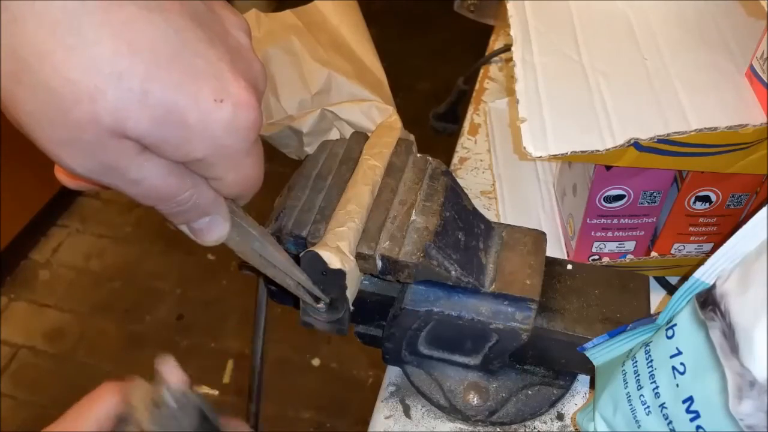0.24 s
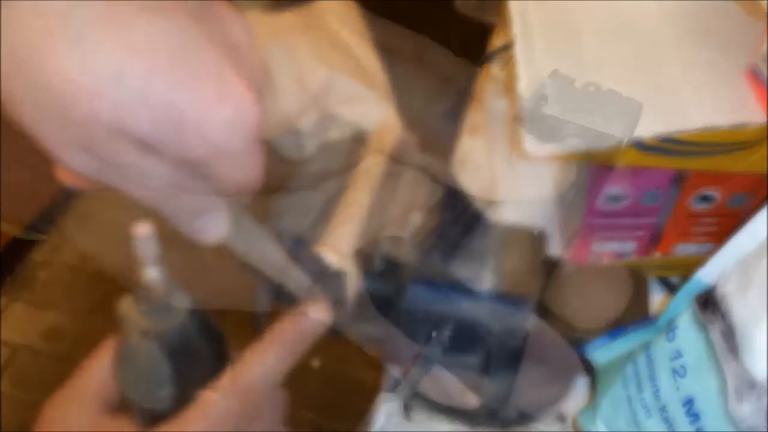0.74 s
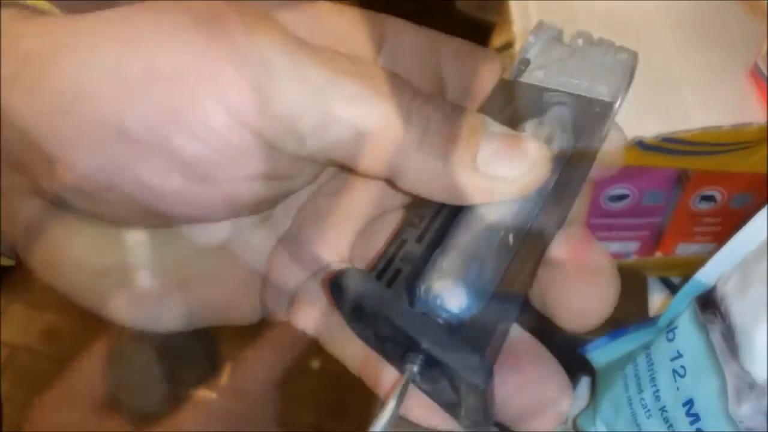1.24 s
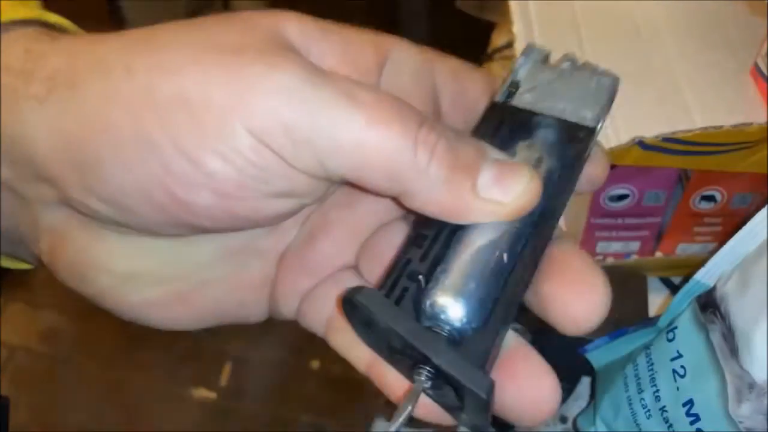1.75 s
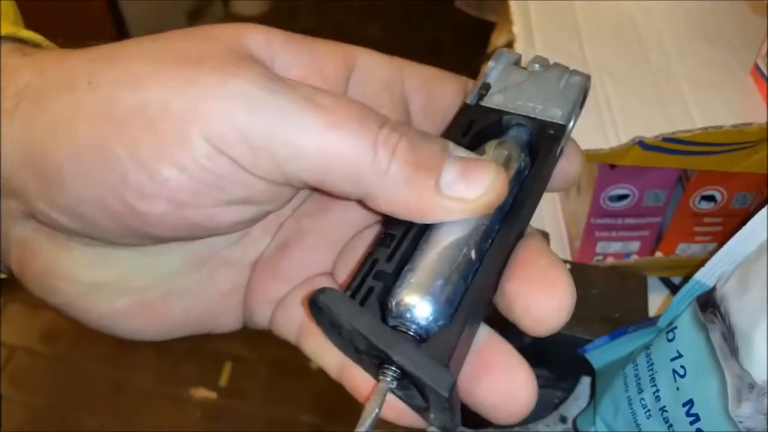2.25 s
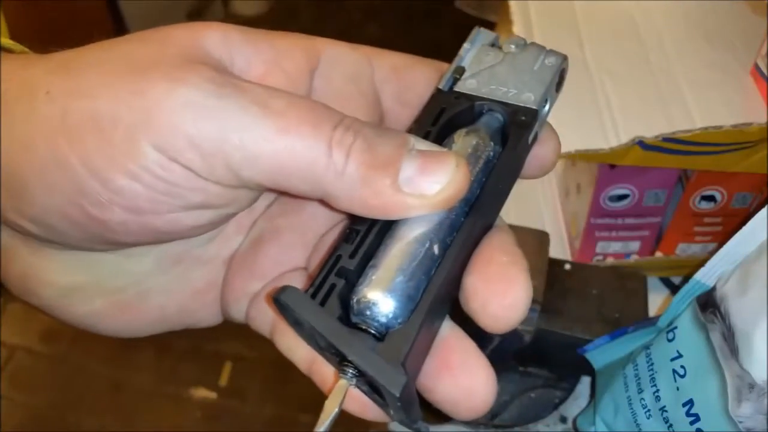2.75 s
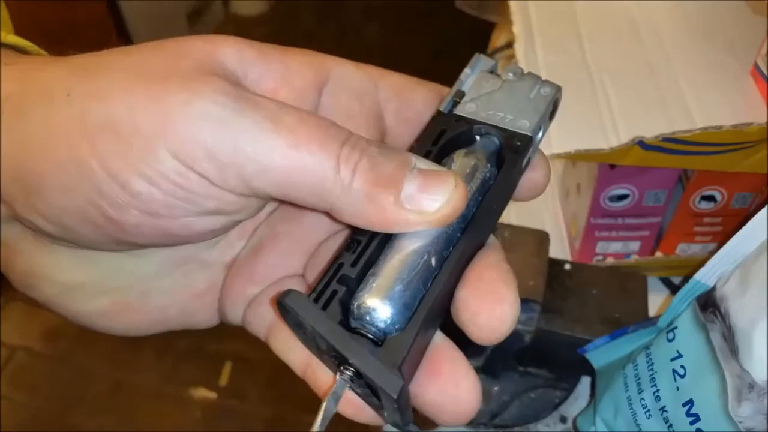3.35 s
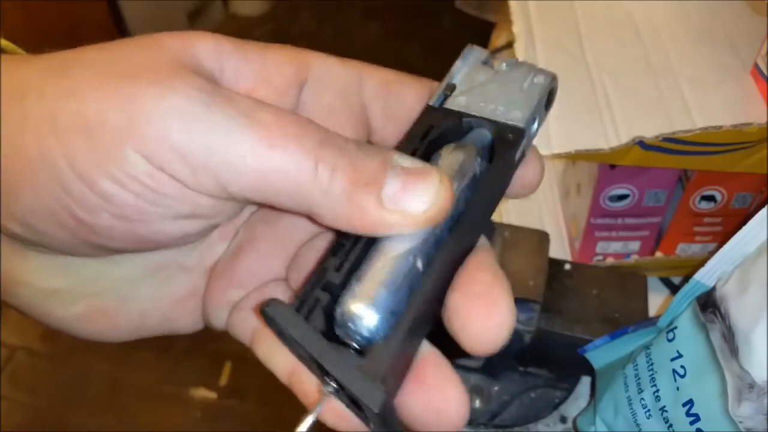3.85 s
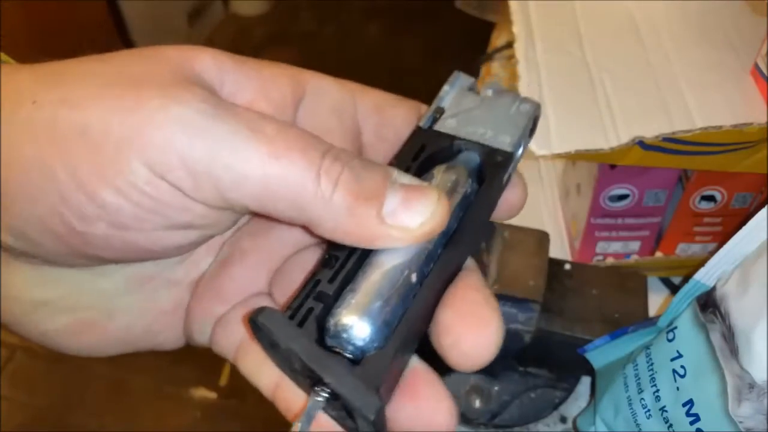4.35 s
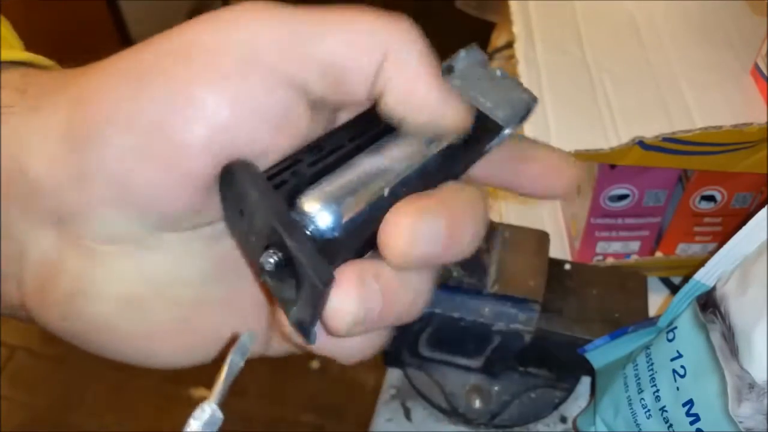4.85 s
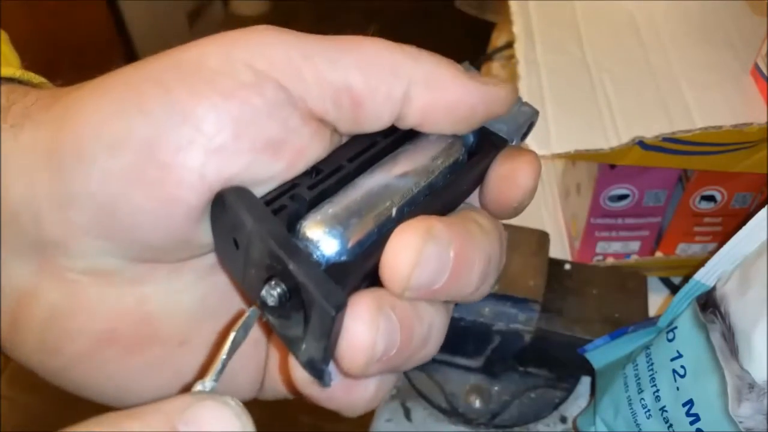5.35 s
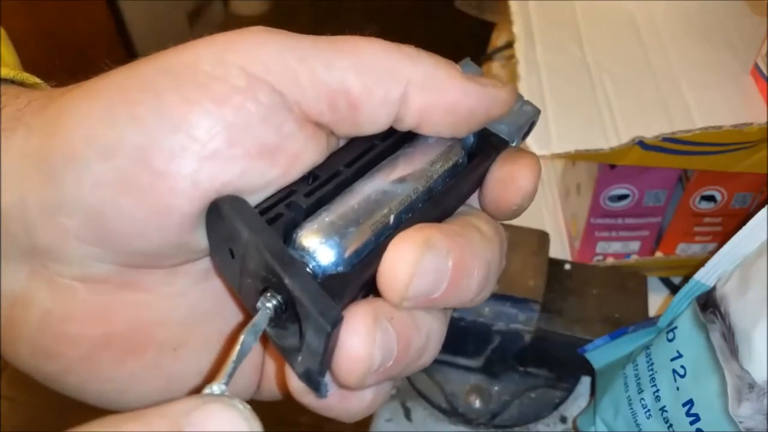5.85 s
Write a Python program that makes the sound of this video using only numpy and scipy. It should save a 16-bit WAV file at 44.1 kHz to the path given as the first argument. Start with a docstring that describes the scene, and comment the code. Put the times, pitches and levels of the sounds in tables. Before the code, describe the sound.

A handheld rotary tool skips and grinds on a metal screw for the first 0.2 seconds, then runs free with a high whine and rattling bearing, fading out by 1.6 seconds. Right then, gas bursts from a small cartridge in a loud, bright, crackling hiss with sharp spits and little pops. From about 1.9 seconds the hiss weakens and sputters, swells slightly around 3.1, and drops at 3.3 to a faint seep that is gone by 4 seconds. At 4.1 a screwdriver blade clacks sharply against the screw. Lighter ticks and short gritty scrapes follow around 4.6 to 4.8 and again from 5.5 to 6.1, while fingers rub very faintly on the plastic holder. Everything is close to the microphone and slightly to the left, in a small workshop with a barely audible appliance hum.

```python
"""A small, faintly humming workshop, with the work close to a stereo microphone and slightly to its left.
A handheld rotary tool grinds a screw, lifts off and whines freely while its sound fades away.
A screwdriver loosens the screw under a gas cartridge: gas bursts through the seal, sputters and hisses
until it is spent. Then the blade knocks and ticks on the screw as fingers shift on the plastic holder."""
import sys
import numpy as np
from scipy import signal
from scipy.fft import rfft, irfft, next_fast_len
from scipy.io import wavfile
from scipy.ndimage import uniform_filter1d, map_coordinates

SR = 44100
rng = np.random.default_rng(int(sys.argv[2]) if len(sys.argv) > 2 else 0)


def log_audio(samples):
    """Write samples as a 16-bit WAV file to the path given in sys.argv[1]."""
    # one column per channel
    frames = np.atleast_2d(samples).T
    # limit to full scale, then quantise
    limited = np.clip(frames, -1, 1)
    pcm = np.round(limited * 32767).astype(np.int16)
    wavfile.write(sys.argv[1], SR, pcm)


N = 268569
T = np.arange(N) / SR


def amp(db):
    """Decibels to gain."""
    return 10 ** (np.asarray(db) / 20)


def unit(x):
    """Scale to rms 1."""
    return x / np.sqrt(np.mean(x ** 2) + 1e-20)


def along(points, hz):
    """Read (frequency, value) points on a log frequency axis."""
    freqs, values = np.transpose(points)
    return np.interp(np.log(hz + 1), np.log(freqs + 1), values)


def ramp(start_s, length_s):
    """A straight rise from 0 to 1."""
    return np.clip((T - start_s) / length_s, 0, 1)


def swell(middle_s, half_width_s):
    """A smooth rise and fall around a moment."""
    return np.exp(-((T - middle_s) / half_width_s) ** 2)


def wobble(per_s):
    """A smooth random curve through per_s knots a second."""
    return map_coordinates(rng.standard_normal(int(N * per_s / SR) + 4), [T * per_s])


def bursts(times, gains, t60_s):
    """Envelope of sudden bursts that die away, adding in power."""
    hits = np.bincount(np.clip(np.asarray(times) * SR, 0, N - 1).astype(int), np.asarray(gains) ** 2, N)
    power = signal.lfilter([1], [1, -amp(-120 / (t60_s * SR))], hits)
    return np.sqrt(np.abs(power))


def grains(per_s, spread_db, t60_s, count=20000):
    """Envelope (rms 1) of random bursts of uneven size."""
    times = np.cumsum(rng.exponential(1 / per_s, count))
    sizes = amp(spread_db * np.clip(rng.standard_normal(count), -2, 2))
    return unit(bursts(times[times < N / SR], sizes[times < N / SR], t60_s))


def stray(per_s, spread_db, t60_s, count=400):
    """Envelope of loosely spaced bursts with peaks around 1."""
    times = np.cumsum(rng.uniform(.3, 1.7, count)) / per_s
    sizes = amp(spread_db * rng.uniform(-1, 1, count))
    return bursts(times[times < N / SR], sizes[times < N / SR], t60_s)


def filtered(x, response):
    """Multiply the spectrum of x by a function of frequency."""
    length = x.shape[-1]
    padded = next_fast_len(length + 8192)
    return irfft(rfft(x, padded) * response(np.fft.rfftfreq(padded, 1 / SR)), padded)[..., :length]


def coloured(x, spectrum, size=2048):
    """Shape x with a minimum-phase filter of unit energy: only the spectrum's shape counts."""
    gain_db = np.maximum(along(spectrum, np.fft.rfftfreq(size, 1 / SR)), -100)
    cepstrum = irfft(np.log(amp(gain_db)))
    cepstrum[1:size // 2] *= 2
    cepstrum[size // 2 + 1:] = 0
    kernel = irfft(np.exp(rfft(cepstrum)))
    return signal.fftconvolve(x, kernel[None] / np.linalg.norm(kernel), axes=1)[:, :x.shape[1]]


def ringing(x, modes):
    """Add band-pass resonances to x."""
    def response(hz):
        return 1 + sum(amp(db) * 1j * hz * width / (pitch ** 2 - hz ** 2 + 1j * hz * width)
                       for pitch, width, db in modes)
    return filtered(x, response)


def pan(left_db):
    """Channel gains that put the left left_db above the right."""
    return amp([[left_db / 2], [-left_db / 2]])


def left_first(x, lead_ms):
    """A source off to the left reaches that side of the microphone sooner."""
    return filtered(x, lambda hz: np.exp(1j * np.pi * hz * lead_ms / 1000 * np.array([[1], [-1]])))


# Likeness of the microphone's two sides: frequency_hz, correlation
STEREO_LIKENESS = [(60, 0.22), (300, 0.47), (700, 0.28), (1500, 0.21), (4000, 0.078)]
def noise():
    """White stereo noise, partly alike in the bass and almost unrelated in the treble."""
    def mid_side_gains(hz):
        angle = np.arccos(np.clip(along(STEREO_LIKENESS, hz), -1, 1)) / 2
        return np.array([np.cos(angle), np.sin(angle)])
    mid, side = filtered(rng.standard_normal((2, N)), mid_side_gains)
    return unit(np.array([mid + side, mid - side]))


def nearby(x, echo_db, t60_s, size=4096):
    """Reflections from hand, vice and bench ripple the spectrum."""
    t = np.arange(size) / SR
    tail = rng.standard_normal((2, size)) * amp(-60 * t / t60_s) * (t > .002)
    tail *= amp(echo_db) / np.linalg.norm(tail, axis=1, keepdims=True)
    return (x + signal.fftconvolve(x, tail, axes=1)[:, :N]) / np.hypot(1, amp(echo_db))


# Decay of the small room: frequency_hz, t60_s
ROOM_DECAY = [(200, 0.16), (3000, 0.22), (8000, 0.17), (15000, 0.18)]
def walls(x):
    """The close walls answer after 5 ms with a short tail."""
    hz, t, spectra = signal.stft(rng.standard_normal((2, SR // 2)), SR, nperseg=256)
    tail = signal.istft(spectra * amp(-60 * t / along(ROOM_DECAY, hz)[:, None]), SR, nperseg=256)[1]
    tail = np.pad(tail, ((0, 0), (SR // 200, 0)))
    return signal.fftconvolve(x, tail / np.linalg.norm(tail[0]), axes=1)[:, :N]


# Room tone all around the microphone: frequency_hz, relative_db
ROOM_SPECTRUM = [(12, -40), (20, -5), (27, -17), (104, -11), (228, -15.5), (270, -6.5), (310, -17.5),
                 (357, -7.5), (542, -14), (624, -18), (825, -14.5), (1120, -24.5), (1570, -24),
                 (4060, -34.5), (16000, -30.5)]
# An appliance in the background: pitch_hz, level_db
HUM_TONES = [(71.9, -87), (100, -87), (261.6, -90.5), (362.9, -84), (818.6, -79.5), (1620, -93.5),
             (9250, -95)]
def workshop():
    """Room tone with the faintly wavering hum of an appliance."""
    hum = sum(amp(db) * unit(amp(1.5 * wobble(3)) * np.sin(2 * np.pi * hz * T + .5 * wobble(4)))
              for hz, db in HUM_TONES)
    room_tone = amp(-69.5) * unit(filtered(noise(), lambda hz: amp(along(ROOM_SPECTRUM, hz))))
    return (hum + room_tone) * pan(1.5)


# Fingers shifting on the holder, close up: middle_s, half_width_s, level_db
FINGER_STROKES = [(3.584, 0.056, -70.5), (4.2, 0.39, -79.5), (4.77, 0.123, -73.5), (5.0, 0.15, -74.5),
                  (5.85, 0.35, -78)]
# Skin on plastic: frequency_hz, relative_db
SKIN_SPECTRUM = [(590, -42), (1000, -10), (1810, 2), (2780, -4.5), (3980, -4.5), (4410, -7), (9380, -10.5),
                 (10300, -4), (16000, -28)]
def hand():
    """Fingers rub the plastic; one soft bump goes through the grip."""
    strokes = sum(amp(db) * swell(middle, half) for middle, half, db in FINGER_STROKES)
    friction = noise() * unit(5 + grains(per_s=230, spread_db=4, t60_s=.008))
    rub = strokes * coloured(friction, SKIN_SPECTRUM) * pan(4)
    bump_age_s = np.maximum(T - 5.94, 0)
    bump = amp(-65) * np.sin(2 * np.pi * 68 * bump_age_s) * amp(-60 * bump_age_s / .15)
    return rub + bump


# Blade meeting screw, close up: start_s, strength_db, brightness_db, scrape_db
BLADE_CONTACTS = [(3.8396, -61, -19.5, -65), (4.1068, -21.5, -21.5, -47.5), (4.5825, -51, -28.5, -60.5),
                  (4.5983, -52, -25.5, -54), (4.6206, -37.5, -24, -51), (4.6343, -46.5, -17.5, -68),
                  (4.73, -37, -4.5, -55), (4.7514, -48, -0.5, -64), (4.9836, -60, -7, -77),
                  (5.5304, -49.5, -6, -65), (5.538, -54.5, -16, -60.5), (5.58, -52, -30, -63.5),
                  (5.7324, -47.5, -27, -58.5), (5.7498, -51.5, -23, -59.5), (5.9478, -48, -28, -65.5),
                  (6.0726, -57.5, -25.5, -65)]
# The screw knocking in its plastic holder: frequency_hz, relative_db
CLACK_SPECTRUM = [(88, -72), (150, -26.5), (759, -11), (1020, -10), (1630, -15), (1830, -5.5), (2220, -7.5),
                  (2750, -4), (4080, -5), (5050, -13), (5790, -9), (6640, -19), (8730, -13), (16000, -28.5)]
# The screw's own ring: pitch_hz, width_hz, gain_db
SCREW_MODES = [(1700, 300, -4), (4050, 350, 2), (5850, 300, -2), (9000, 300, -3)]
# The blade sliding: frequency_hz, relative_db
SCRAPE_SPECTRUM = [(530, -21), (900, -4.5), (1100, -6), (1290, -3), (1620, -3), (2040, 1), (3730, -5.5),
                   (4980, 1.5), (5960, -7), (14900, -22), (16000, -31.5)]
def screwdriver():
    """Each contact is a clack of screw and holder, with a bright snap of steel and a gritty scrape."""
    start_s, strength_db, brightness_db, scrape_db = np.transpose(BLADE_CONTACTS)
    blows = bursts(start_s, amp(strength_db - 7), t60_s=.013)
    clack = ringing(coloured(noise() * blows, CLACK_SPECTRUM), SCREW_MODES)
    snaps = bursts(start_s, amp(strength_db + brightness_db - 7), t60_s=.015)
    steel_spectrum = [(3000, -28), (7000, 10.5), (10000, -1), (16000, -10)]
    snap = coloured(noise() * snaps, steel_spectrum)
    # every contact slides on; light ones also slide in, while a hard blow comes out of the air
    is_light = strength_db < -30
    approach = sum(gain * swell(s, .0085) for s, gain in zip(start_s, amp(scrape_db - 6) * is_light))
    slide = np.hypot(bursts(start_s, amp(scrape_db), t60_s=.12), approach)
    grit = unit(.9 + grains(per_s=600, spread_db=2.5, t60_s=.005))
    scrape = nearby(coloured(noise() * slide * grit, SCRAPE_SPECTRUM), echo_db=-6.5, t60_s=.03)
    return (clack + snap + scrape) * pan(3.6)


# Air from the tool's fan: frequency_hz, relative_db
FAN_SPECTRUM = [(1760, -28.5), (3000, -2.5), (3520, -6), (4470, -4.5), (5250, -4), (5710, -3),
                (7150, -10.5), (8050, -6.5), (9200, -11), (11200, -9), (12100, -13.5), (14300, -14),
                (16000, -30.5)]
def cooling_fan(once_a_turn, throb):
    """Fan air pulses with the shaft and the torque, fading 2 dB a second faster than the motor."""
    rush = coloured(noise() * unit(once_a_turn * (1 + .2 * throb)), FAN_SPECTRUM)
    return amp(-.7 - 2 * T) * nearby(rush, echo_db=-5.5, t60_s=.048) * pan(.96)


# The bearing heard through the housing: frequency_hz, relative_db
HOUSING_SPECTRUM = [(88, -52.5), (150, -23), (217, -28.5), (311, -15), (347, -10.5), (524, -8.5), (680, -2),
                    (945, -4.5), (1230, -0.5), (1450, -4), (1600, -11.5), (1850, -5), (2250, -9.5),
                    (2760, -6), (3260, -16), (4000, -15), (5200, -48), (8800, -120)]
def bearing(once_a_turn, throb):
    """The bearing chatters and knocks, harder for a while before it settles."""
    loose_db = 2 * (ramp(.328, .02) - ramp(.695, .018))
    impacts = .7 + grains(per_s=260, spread_db=2.5, t60_s=.01)
    chatter = unit((1 + .35 * throb) * once_a_turn * impacts)
    level = amp(.5 + loose_db + .49 * wobble(12))
    rattle = nearby(coloured(noise() * chatter, HOUSING_SPECTRUM), echo_db=-4.5, t60_s=.044)
    knocks = coloured(noise() * stray(per_s=30, spread_db=3, t60_s=.015), HOUSING_SPECTRUM)
    return level * rattle * pan(2.2) + amp(7.5 + loose_db) * knocks


def rough_tone(turns, roughness, width_hz):
    """A tone that bearing play partly smears into a narrow band, differently in each direction."""
    smear = np.array([wobble(width_hz) + 1j * wobble(width_hz)
                      + wobble(width_hz / 4) + 1j * wobble(width_hz / 4) for _ in range(2)]) / 2
    steady = unit(amp(1.8 * wobble(12))) * np.exp(2j * np.pi * rng.random())
    envelope = np.sqrt(1 - roughness) * steady + np.sqrt(roughness) * smear
    return unit(np.real(envelope * np.exp(2j * np.pi * turns)))


# Motor tones at the microphone: shaft_multiple, relative_db, left_db, roughness_share
SHAFT_ORDERS = [(1.004, -21, -1.5, 0.1), (2, -15, -8.5, .5), (4, -25, -3.5, .75), (8, -15.5, 6.5, 0.6),
                (16.1, -21, 17, .9), (19.1, -30.5, -6, .9), (24.08, -25.5, -2, .95), (31.8, -19, -11.5, 1),
                (40, -33, 1, .95)]
def motor_whine(turns):
    """Tones at the nearest whole multiples of the shaft speed, the higher ones smeared more widely."""
    return sum(amp(db) * pan(left_db) * rough_tone(round(order) * turns, roughness, 50 * np.sqrt(order))
               for order, db, left_db, roughness in SHAFT_ORDERS)


def rotary_tool():
    """The unloaded motor speeds up, throbbing with the mains-fed torque, while its sound fades away."""
    loaded_hz, free_hz, spin_up_s = 343.3, 349.5, .92
    shaft_hz = loaded_hz + (free_hz - loaded_hz) * ramp(0, spin_up_s)
    throb = np.sin(2 * np.pi * 100 * T)
    turns = np.cumsum(shaft_hz * (1 + .0005 * wobble(23) + .0016 * throb)) / SR
    once_a_turn = 1 + .15 * np.sin(2 * np.pi * turns)
    whine = amp(3) * motor_whine(turns)
    # the wheel squeals as it leaves the screw
    squeal = amp(-46) * swell(.21, .089) * rough_tone(16 * turns, roughness=.8, width_hz=300) * pan(8)
    running = whine + bearing(once_a_turn, throb) + cooling_fan(once_a_turn, throb)
    fade = amp(-42.5) * (1 - ramp(0, 1.723)) ** .85
    return (fade * running + squeal) * (1 - ramp(1.6, .03))


# The wheel catching, close up: start_s, strength_db, chips_db
WHEEL_CATCHES = [(0.003, -23, -27.5), (0.036, -22.5, -28.5), (0.0727, -14, -35), (0.105, -29.5, -32.5),
                 (0.138, -26, -32.5)]
# Chips torn from the screw: frequency_hz, relative_db
CHIP_SPECTRUM = [(70, -21), (110, -11.5), (155, -2.5), (220, -5), (400, -5.5), (700, 1.5), (1000, 1.5),
                 (1450, 9.5), (1800, 1), (4000, -1), (6500, 1), (9000, 1), (11000, -3), (16000, -11)]
def grinding():
    """The wheel skips and catches on the screw; a spray of tiny chips swells just after each catch."""
    start_s, strength_db, chips_db = np.transpose(WHEEL_CATCHES)
    bite = sum(amp(db) * swell(s + .0053, .011) for s, db in zip(start_s, chips_db))
    chips = amp(-1) * bite * grains(per_s=1700, spread_db=1, t60_s=.0018)
    catches = bursts(start_s, amp(strength_db - 6.5), t60_s=.017)
    return coloured(noise() * np.hypot(chips, catches), CHIP_SPECTRUM)


# The whisper of the nearly empty cartridge: frequency_hz, relative_db
SEEP_SPECTRUM = [(300, -28), (1200, -5), (2300, -4), (3500, -8.5), (6000, -9), (7200, -2), (9500, 0),
                 (11000, -0.5), (13000, -2), (16000, -6.5)]
def gas_seep():
    """The last gas seeps out, holds briefly and dies away."""
    end_s, release_db_per_s = 3.74, 83
    level = ramp(3.25, .08) * amp(-69 - release_db_per_s * np.maximum(T - end_s, 0))
    return level * coloured(noise(), SEEP_SPECTRUM) * pan(2.8)


# Gas passing the seal: time_s, level_db
SEAL_FLOW = [(1.61, -32.5), (1.65, -24.5), (1.755, -25), (1.815, -36), (1.86, -32), (1.915, -40.5),
             (2.05, -43.5), (2.12, -49), (2.19, -45), (2.22, -52.5), (2.6, -49.5), (2.7, -47.5),
             (2.95, -48.5), (3.1, -40.5), (3.22, -42), (3.29, -50)]
def gas_flow(pressure_lost):
    """Strength of the jet from the opening of the seal until empty; a weak jet clogs for moments."""
    open_s, empty_s, clog_db = 1.599, 3.325, 10
    flow_db = np.interp(T, *np.transpose(SEAL_FLOW))
    clogs = stray(per_s=3.2, spread_db=3, t60_s=.016) > amp(-60)
    clogged = uniform_filter1d(clogs.astype(float), SR // 200)
    level = amp(flow_db - clog_db * pressure_lost * clogged + .99 * wobble(35))
    return level * ramp(open_s, .0066) * (1 - ramp(empty_s, .021))


# The jet close up, at full and at low pressure: frequency_hz, relative_db
STRONG_JET_SPECTRUM = [(2650, -38.5), (4500, -24), (5000, -18), (5680, -6), (6150, -11.5), (6590, -9),
                       (7030, -2), (7370, -3), (7820, -1.5), (8240, 0.5), (9360, -5.5), (10200, 0.5),
                       (13300, -10.5), (15200, -12.5), (16000, -15.5)]
WEAK_JET_SPECTRUM = [(2350, -45.5), (4000, -14.5), (4360, -10), (5220, -12), (7140, 0), (7620, -3.5),
                     (8600, -1), (9220, -1), (10000, -3.5), (12000, -6.5), (12800, -6), (15100, -7.5),
                     (16000, -19)]
# Low sputter under the hiss: frequency_hz, relative_db
SPUTTER_SPECTRUM = [(88, -40.5), (150, -12), (326, -1), (378, -17), (632, 1.5), (5000, 2.5), (6500, -29),
                    (11000, -120)]
# The jet striking the palm: frequency_hz, relative_db
PALM_SPECTRUM = [(20, -13.5), (45, -10), (120, -0.5), (200, -7.5), (300, 0.5), (450, 0), (600, -3),
                 (1000, -30.5), (3000, -52)]
def gas_jet(pressure_lost):
    """Mist and drops chop the hiss into crackle, and its colour shifts as the pressure falls."""
    mist = grains(per_s=900, spread_db=2, t60_s=.003)
    drops = grains(per_s=70, spread_db=3, t60_s=.0026)
    crackle = unit(1.2 + mist + .4 * drops)
    strong = nearby(coloured(noise() * crackle, STRONG_JET_SPECTRUM), echo_db=-2.5, t60_s=.025)
    weak = nearby(coloured(noise() * crackle, WEAK_JET_SPECTRUM), echo_db=-5, t60_s=.025)
    hiss = amp(-.5) * (np.sqrt(1 - pressure_lost) * strong + np.sqrt(pressure_lost) * weak)
    sputter = amp(-10.5 - 4 * pressure_lost) * coloured(noise() * crackle, SPUTTER_SPECTRUM)
    # only the strong jet buffets the palm
    buffet = amp(-22.5) * (1 - pressure_lost) * coloured(noise(), PALM_SPECTRUM)
    return hiss + sputter + buffet


# Large spits at the seal: start_s, spit_db, pop_db
LIQUID_SPITS = [(1.6013, -18.5, -47), (1.742, -19, -21.5), (1.8042, -14, -45), (1.8413, -17.5, -48),
                (1.8809, -18, -28), (1.9611, -27.5, -49), (2.075, -25.5, -46), (2.581, -31, -58),
                (2.6358, -22.5, -43), (2.6957, -29.5, -48), (2.716, -28, -48), (3.0022, -23, -52),
                (3.08, -24.5, -55), (3.1686, -21, -46.5), (3.2302, -22.5, -61)]
def gas_spits(weak_flow):
    """Liquid gas spits, each time with a low pop; small droplets join in as the jet weakens."""
    start_s, spit_db, pop_db = np.transpose(LIQUID_SPITS)
    droplets = amp(7.5) * weak_flow * stray(per_s=24, spread_db=4, t60_s=.008)
    spits = bursts(start_s, amp(spit_db - 7), t60_s=.0088) + droplets
    pops = bursts(start_s, amp(pop_db + 3.5), t60_s=.0088) + amp(-14) * droplets
    return coloured(noise() * spits, WEAK_JET_SPECTRUM) + coloured(noise() * pops, SPUTTER_SPECTRUM)


# Air pockets around the cartridge: pitch_hz, width_hz, gain_db
POCKET_MODES = [(5704, 620, -8), (7215, 400, -5), (7960, 290, -8.5), (9160, 370, -5.5), (15600, 500, -2.5)]
def gas_cartridge():
    """The cartridge empties through its seal; jet and spits ring the air pockets around it."""
    pressure_lost = ramp(1.795, .47)
    flow = gas_flow(pressure_lost)
    escaping = flow * gas_jet(pressure_lost) + gas_spits(pressure_lost * flow)
    return ringing(escaping, POCKET_MODES) * pan(3.2) + gas_seep()


def scene():
    """Tool, cartridge and blade, close and left of the microphone, with the workshop behind."""
    tool = left_first(rotary_tool() + grinding(), lead_ms=.35)
    gas = left_first(gas_cartridge(), lead_ms=.12)
    ticks = left_first(screwdriver(), lead_ms=.22)
    reflections = walls(amp(-7) * tool + amp(-8) * gas + amp(-15) * ticks)
    return tool + gas + ticks + reflections + hand() + workshop()


def record(dry):
    """The recorder keeps nothing above its band limit."""
    return filtered(dry, lambda hz: hz < 15830)


dry = scene()
out = record(dry)
log_audio(out)
```